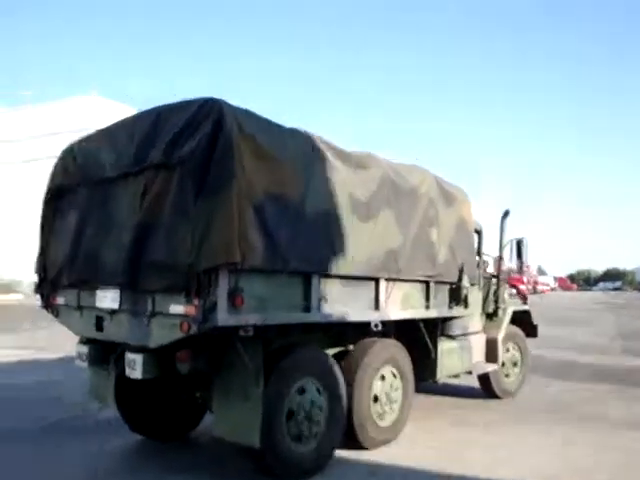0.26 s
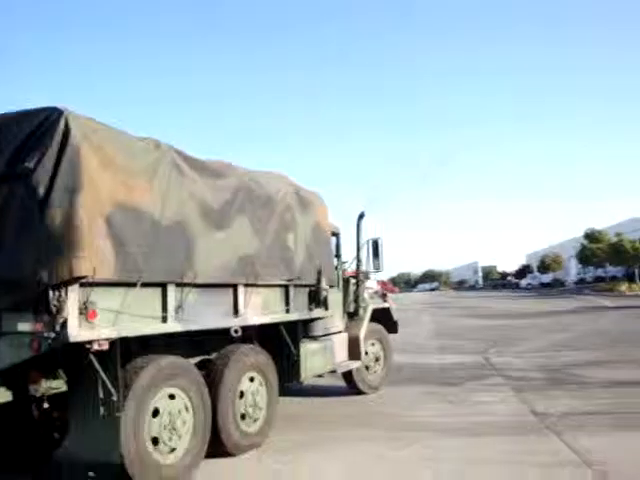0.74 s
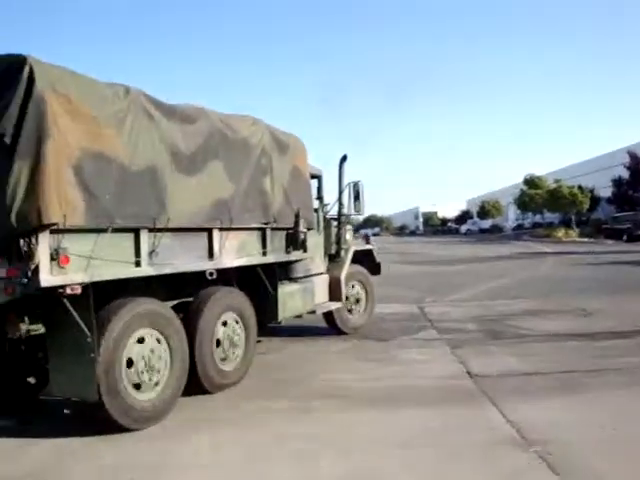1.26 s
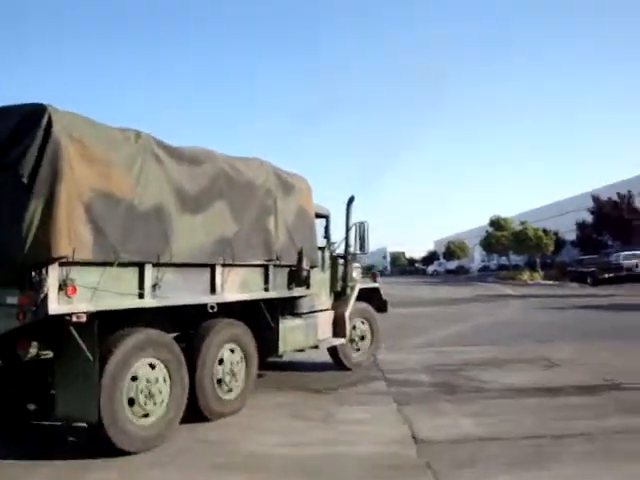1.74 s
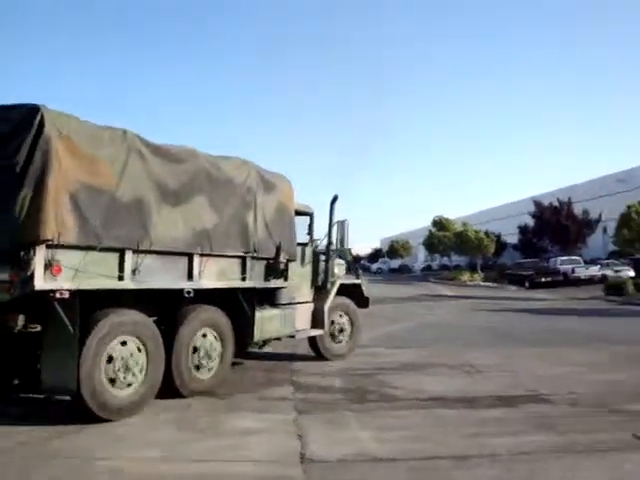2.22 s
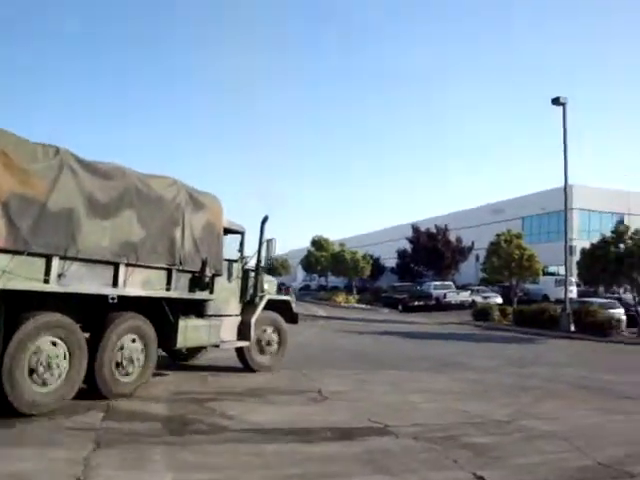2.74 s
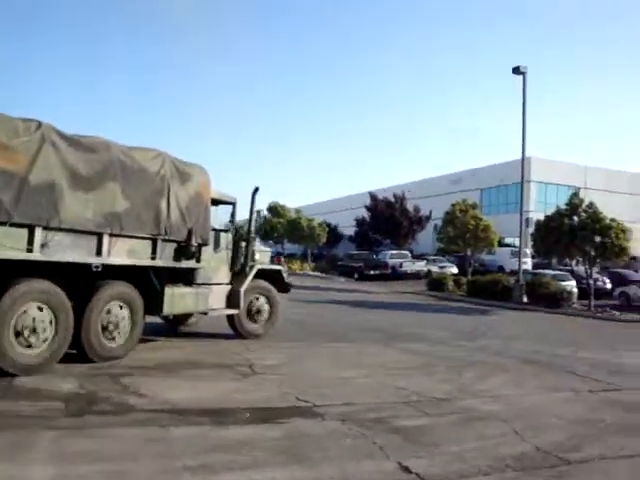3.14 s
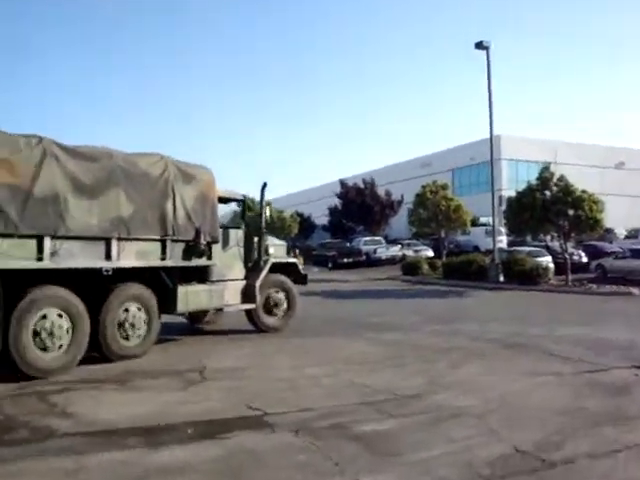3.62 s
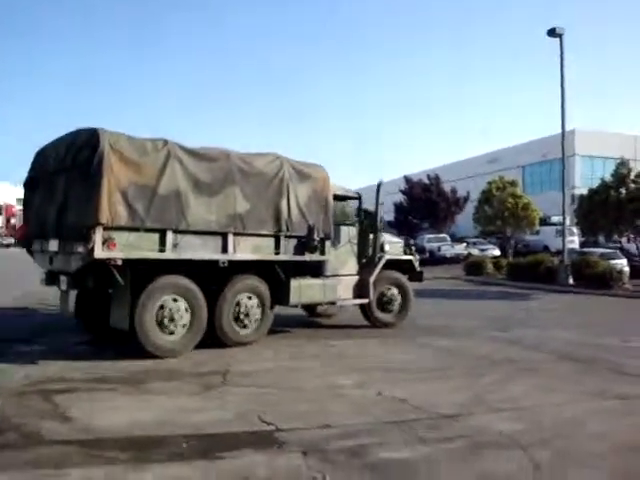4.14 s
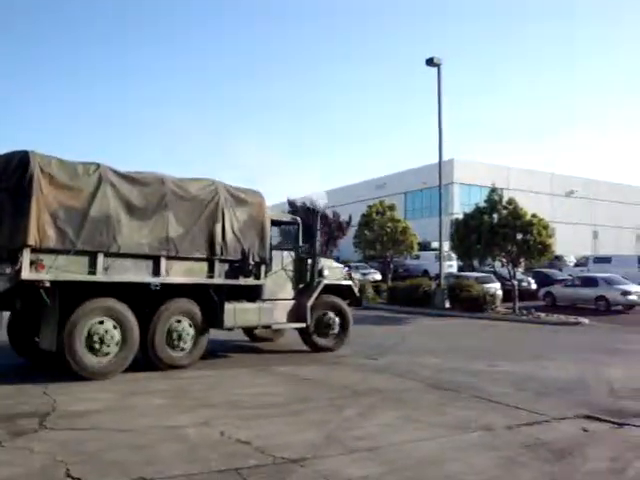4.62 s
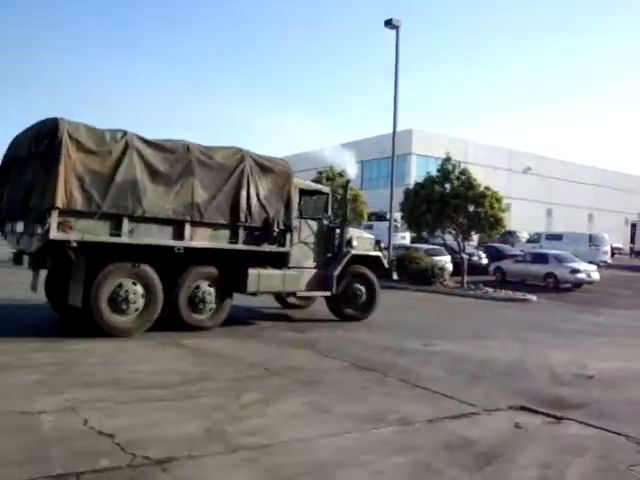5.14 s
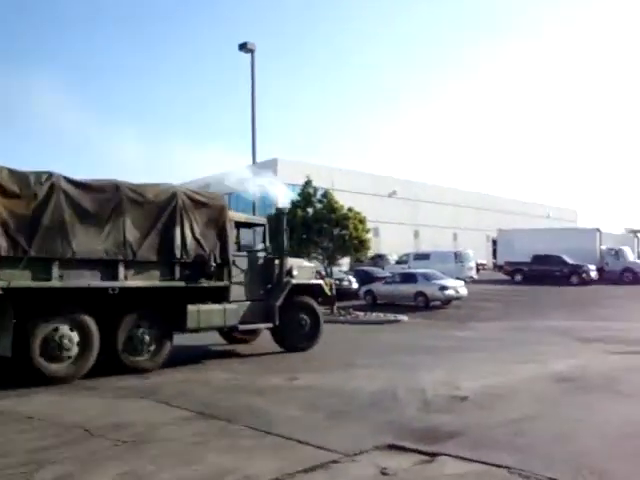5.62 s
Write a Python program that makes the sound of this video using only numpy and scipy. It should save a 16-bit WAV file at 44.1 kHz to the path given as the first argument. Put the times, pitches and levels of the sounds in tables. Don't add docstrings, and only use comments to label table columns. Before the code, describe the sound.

A heavy diesel truck roars away across a paved lot, exhaust chopping hard while a turbo whistle climbs, dips at a gear change, and climbs higher.

```python
import sys
import numpy as np
from scipy import signal
from scipy.io import wavfile
from scipy.ndimage import uniform_filter1d, map_coordinates

SR = 44100
rng = np.random.default_rng(int(sys.argv[2]) if len(sys.argv) > 2 else 0)


def convert_level_to_amplitude(level_db):
    exponent = np.asarray(level_db, float) / 20
    return 10 ** exponent


def unload_wav(signal):
    wavfile.write(
        sys.argv[1],
        SR,
        np.round(np.clip(np.atleast_2d(signal).T, -1, 1) * 32767).astype(np.int16),
    )


N = 258867
T = np.arange(N) / SR
GEAR_S = 3


def evened(x):
    return x / np.sqrt(np.mean(x ** 2) + 1e-20)


def steadied(x):
    return x / np.sqrt(uniform_filter1d(x ** 2, size=8000))


def noise():
    return rng.standard_normal(N)


def curves(rows):
    s, *columns = np.transpose(rows)
    return [np.interp(T, s, c) for c in columns]


def colour(x, points):
    f, db = np.transpose(points)
    hz = abs(np.fft.fftfreq(8192, 1 / SR))
    log_gain = np.log(convert_level_to_amplitude(np.interp(np.log(hz + 1), np.log(f), db, right=-80)))
    taps = np.fft.ifft(np.exp(np.conj(signal.hilbert(log_gain)))).real[:4096]
    return evened(signal.oaconvolve(x, taps)[:N])


def drift(hz):
    return evened(signal.sosfilt(signal.butter(2, hz, fs=SR, output="sos"), noise()))


def resonate(x, hz, width):
    turn = np.exp(2j * np.pi * np.cumsum(hz * np.ones(len(x))) / SR)
    r = np.exp(-np.pi * width / SR)
    smooth = signal.lfilter([1], [1, -2 * r, r * r], x / turn)
    return evened((turn * smooth).real)


# time in seconds, firings per second.
FIRING = [(0.0, 46.57), (0.19, 49.73), (0.55, 48.26), (0.78, 50.61), (1.2, 52.56), (1.65, 54.81),
          (1.79, 53.24), (2.4, 59.82), (2.75, 49.71), (3.0, 53.34), (3.63, 51.78), (3.78, 54.41),
          (4.08, 49.93), (4.42, 59.24), (4.77, 58.76), (4.98, 63.44), (5.4, 66.12), (5.87, 70.98)]


def count_firings():
    first_turn = -.493
    return first_turn + np.cumsum(curves(FIRING)[0]) / SR


# time in seconds, throttle from 0 to 1,
# load (about 0 to 1), which is how deeply each blow gates the gas flow.
EXHAUST = [(0, 1., 0.69), (.5, 0.87, 0.64), (1.2, 0.75, 0.64), (1.75, .9, 0.58), (2.25, 0.71, 0.69),
           (2.52, 0.88, 0.68), (2.6, 0, 0.32), (2.8, 0.58, 0.46), (2.9, 0.13, 0.45), (3.3, 0.4, 0.24),
           (3.4, 0.5, 0.65), (3.65, 0.69, 0.81), (4.05, 0.72, 1.05), (4.22, 0.7, 1), (4.35, .75, 0.85),
           (4.85, 0.85, 0.88), (5.15, 0.93, 0.39), (5.87, 0.56, 0.92)]


def pedal():
    throttle, load = curves(EXHAUST)
    return throttle, np.clip(load, 0, 1.5)


# thump, roar, hiss, blade rush, in dB.
SHUT_DB = [-47, -37, -40, -35.5]
OPEN_DB = [-22.5, -30.5, -41, -27]


def layer_levels(throttle):
    return [shut + (wide - shut) * throttle for shut, wide in zip(SHUT_DB, OPEN_DB)]


def blows(turns, pattern_db, chance_db):
    firing = np.floor(turns + .5).astype(int)
    luck = rng.standard_normal(400)[firing]
    gear = (T > GEAR_S).astype(int)
    cylinders_db = np.asarray(pattern_db)[gear, firing % len(pattern_db[0])]
    return cylinders_db + chance_db * luck


# one gear, low then higher, with the six cylinders in dB.
GUSTS_DB = [
    [4, 0, -1, 5.5, .5, -1],
    [2.5, .5, 0, 2.5, 0, -1],
]


def gate(turns, load, depth_db, lead, chance_db):
    swell = .5 + .5 * np.cos(2 * np.pi * (turns + lead))
    return steadied(convert_level_to_amplitude(load * swell * (depth_db + blows(turns + lead, GUSTS_DB, chance_db))))


# one gear, low then higher, with the six cylinders in dB.
THUMPS_DB = [
    [8, -3, -6, 11, -2, -7],
    [8, 1, 0, 8, -2, -1],
]
# frequency in Hz, level in dB per Hz.
THUMP = [(150, -40), (300, -20), (450, -9), (600, -3), (720, 0), (1000, -2), (1400, -9), (2200, -20),
         (4000, -34), (6000, -50)]


def thumps(turns, load):
    ahead = turns + .2
    strength = steadied(convert_level_to_amplitude(load * blows(ahead - .5, THUMPS_DB, 3)))
    steps = np.diff(np.floor(ahead), prepend=-1.)
    puffs = np.exp(-(ahead % 1) / 0.2) * noise()
    return colour(strength * (.85 * evened(steps) + .5 * evened(puffs)), THUMP)


# frequency in Hz, level in dB per Hz.
ROAR = [(60, -62), (150, -33), (300, -17), (500, -6.5), (900, -1), (1500, -2.5), (2500, -2.5), (4000, -5.5),
        (5000, -11.5), (5800, -17), (6600, -44.5)]


def roar(turns, load):
    flow = gate(turns, load, depth_db=11, lead=.02, chance_db=1.8)
    return colour(flow * noise(), ROAR)


# frequency in Hz, level in dB per Hz.
HISS = [(3500, -22), (5000, -3), (6000, -2.5), (7000, -4), (8000, -2.5), (10000, -9), (11000, -5.5)]


def hiss(turns, load):
    flow = gate(turns, load, depth_db=5, lead=-.03, chance_db=2.5)
    return colour(flow * noise(), HISS)


# time in seconds, blade pitch in Hz, level in dB.
TURBO = [(0, 1580, -20), (.22, 1681, -25.5), (.45, 1862, -22.5), (.8, 2000, -23), (1.05, 2108, -19.5),
         (1.4, 2236, -21.5), (2., 2667, -20), (2.5, 2961, -27), (2.68, 2735, -16.5), (2.82, 2720, -25.5),
         (2.92, 2591, -18.5), (3.3, 2513, -15.5), (3.5, 2499, -21.5), (4.3, 2925, -21.5), (4.5, 3218, -24),
         (5.05, 3577, -19.5), (5.55, 4000, -25), (5.87, 4120, -22)]


def whistle(turns, load, rush_db):
    hz, db = curves(TURBO)
    flutter = np.clip(-0.044 + 1.057 * load, 0, 1.1)
    sag_hz = 140 * flutter * np.cos(2 * np.pi * (turns + .22))
    blur_hz = (10 + 28 * flutter) * drift(hz=110)
    tone = np.sqrt(2) * np.cos(2 * np.pi * np.cumsum(hz + sag_hz + blur_hz) / SR)
    tone *= convert_level_to_amplitude(db + 2. * drift(hz=20))
    tone *= gate(turns, .1 + .9 * flutter, depth_db=13, lead=.02, chance_db=1.6)
    rush = resonate(noise(), 1.12 * hz, width=950.)
    rush_db = rush_db + 14.5 * np.log2(np.maximum(hz / 3140, 1))
    return tone + convert_level_to_amplitude(rush_db) * gate(turns, load, depth_db=19, lead=.2, chance_db=2.4) * rush


# frequency in Hz, level in dB per Hz.
BLOCK = [(25, -58.5), (60, -45), (120, -25), (220, -13.5), (400, -7), (600, -2.5), (1000, -1.5), (2000, -7),
         (4000, -17), (7000, -21)]


def block(turns):
    level = convert_level_to_amplitude(-33 + drift(hz=8))
    flow = gate(turns, 0.26, depth_db=-4, lead=0, chance_db=4)
    return level * colour(flow * noise(), BLOCK)


# multiple of the firing rate, rms level in dB at the start, and at the end.
ORDERS_DB = [(1, -74, -69), (2, -61, -59), (3, -63, -60), (4, -65, -65), (5, -76, -55)]


def drone(turns, throttle):
    pipe_hz, pipe_width_hz, pipe_db = 236, 14, 15
    orders = np.zeros(N)
    for k, early_db, late_db in ORDERS_DB:
        order_hz = k * np.gradient(turns) * SR
        ring_db = pipe_db * np.exp(-((order_hz - pipe_hz) / pipe_width_hz) ** 2)
        db = early_db + (late_db - early_db) * T / T[-1] + ring_db + 1.2 * drift(hz=1.3)
        orders += convert_level_to_amplitude(db) * np.cos(2 * np.pi * (k * turns + rng.random()))
    return np.sqrt(2) * np.clip(throttle, 0, .85) * orders


# frequency in Hz, rms level in dB.
HUM = [(72, -73), (144, -63), (232, -64), (291, -61.5)]


def distant_hum():
    hum = np.zeros(N)
    for hz, db in HUM:
        hum += convert_level_to_amplitude(db + 2 * drift(hz=3.9)) * np.cos(2 * np.pi * hz * T + .5 * drift(hz=3.1))
    return np.sqrt(2) * hum


# start in seconds, peak level in dB, ring in Hz, width in Hz,
# length in seconds.
CLANKS = [
    (2.711, -21, 4200, 1800, .014),
    (2.712, -29, 6000, 1500, .014),
    (2.812, -22, 3300, 700, .012),
    (2.81, -51, 100, 25, .05),
    (4.265, -22, 1200, 700, .03),
    (.785, -19, 1250, 300, .012),
    (3.37, -28, 800, 500, .04),
    (2.83, -20, 3400, 1200, .008),
]


def clanks():
    out, t = np.zeros(N), np.arange(6000) / SR
    for s, db, hz, width, length in CLANKS:
        band = resonate(rng.standard_normal(len(t)), hz, width)
        shape = np.exp(-t / length) * np.minimum(t / .002, 1)
        out[round(s * SR):][:len(t)] += convert_level_to_amplitude(db) * band * shape
    return out


# time in seconds, echo lag in milliseconds.
GROUND = [(0, 2.6), (.35, 2.64), (.9, 2.625), (1.15, 2.575), (1.75, 2.575), (2.5, 2.43), (2.95, 2.26),
          (3.4, 2.185), (3.9, 2.185), (4.4, 2.095), (5.2, 2.045), (5.55, 1.965), (5.87, 1.955)]


def lot(x):
    lag_ms, = curves(GROUND)
    dull = signal.lfilter([.55], [1, -.45], x)
    echo = map_coordinates(dull, [np.arange(N) - lag_ms * SR / 1000], order=3)
    at = np.arange(600, 20000, 40)
    taps = np.zeros(21000)
    taps[at + rng.integers(0, 40, len(at))] = rng.choice([-1., 1.], len(at)) * convert_level_to_amplitude(-60 * at / SR / 1.38)
    walls = signal.oaconvolve(dull, taps / np.linalg.norm(taps))[:N]
    return convert_level_to_amplitude(-3.5) * (x + .72 * echo + convert_level_to_amplitude(-8) * walls)


def scene():
    turns = count_firings()
    throttle, load = pedal()
    thump_db, roar_db, hiss_db, rush_db = layer_levels(throttle)
    exhaust = convert_level_to_amplitude(thump_db - 3) * thumps(turns, load)
    exhaust += convert_level_to_amplitude(roar_db + 8.5) * roar(turns, load)
    exhaust += convert_level_to_amplitude(hiss_db - 1.5) * hiss(turns, load)
    across = lot(exhaust + whistle(turns, load, rush_db) + clanks())
    return (across + block(turns) + drone(turns, throttle) + distant_hum())[None]


def starved(x):
    hz, t, z = signal.stft(x, SR, nperseg=512)
    width = 8
    power = (abs(z[:-1]) ** 2).reshape(-1, width, len(t)).mean(axis=1)
    power = np.repeat(power, width, axis=0)
    faint = power < convert_level_to_amplitude(2 * -4.) * uniform_filter1d(power, size=60, axis=1)
    z[:-1] *= np.where(faint & (hz[:-1, None] > 4800), .05, 1)
    return signal.istft(z, SR, nperseg=512)[1][:N]


def low_pass(x):
    return signal.sosfilt(signal.butter(12, 10050, fs=SR, output="sos"), x)


def record(dry):
    thin = signal.sosfilt(signal.butter(2, 85, "high", fs=SR, output="sos"), dry[0])
    overloaded = 0.92 * np.tanh(thin / 0.76)
    mix = starved(overloaded)[None]
    return low_pass(mix)


dry = scene()
out = record(dry)
unload_wav(out)
```